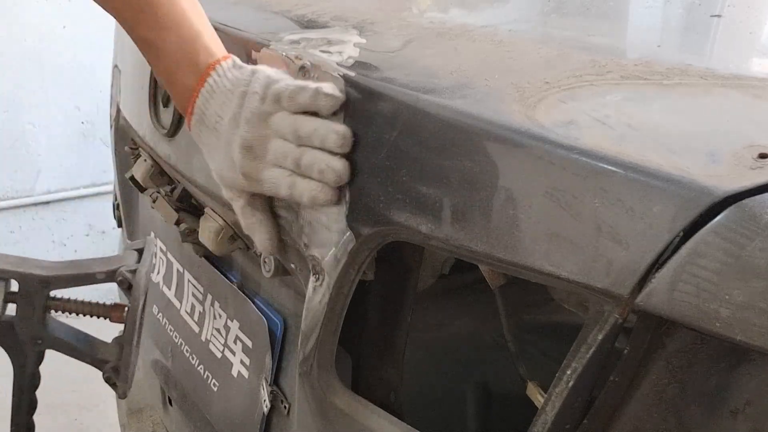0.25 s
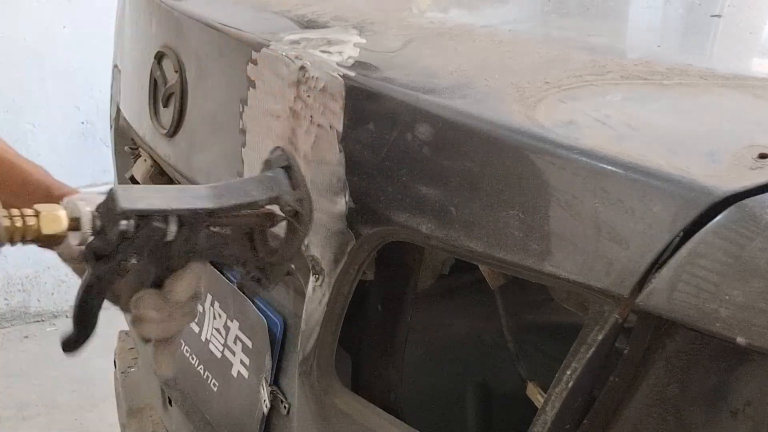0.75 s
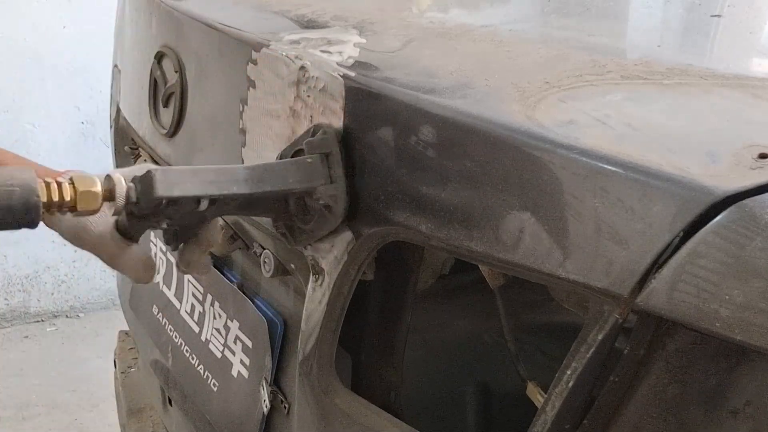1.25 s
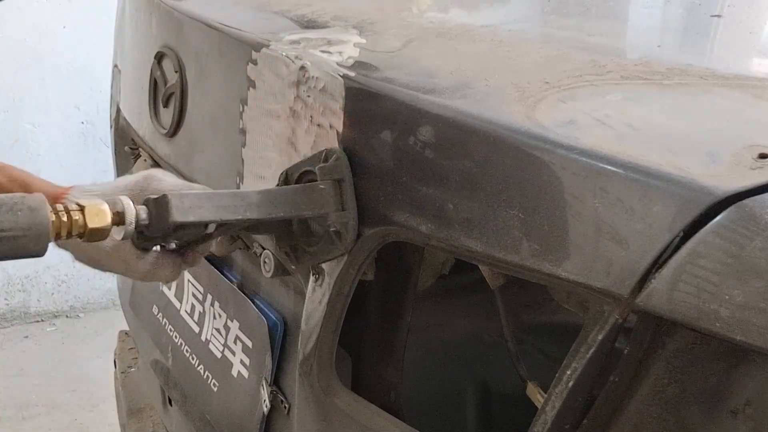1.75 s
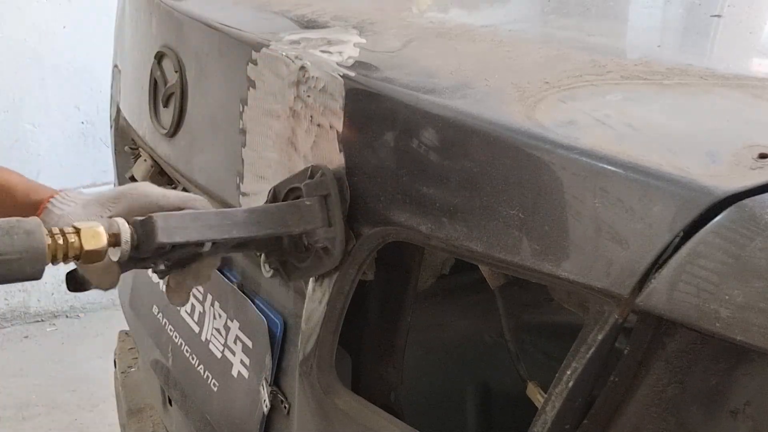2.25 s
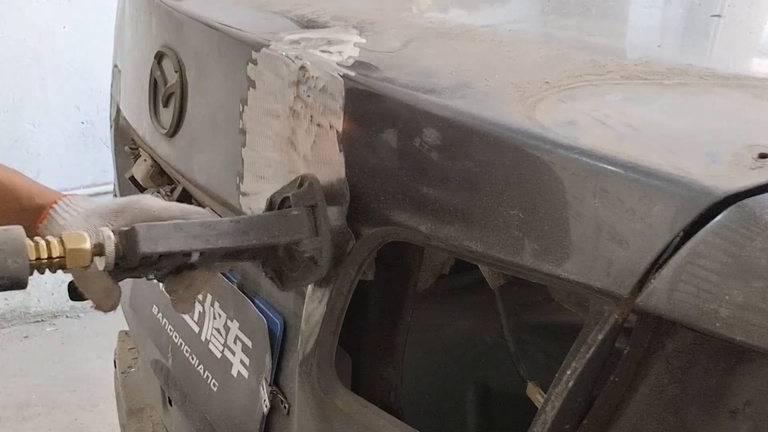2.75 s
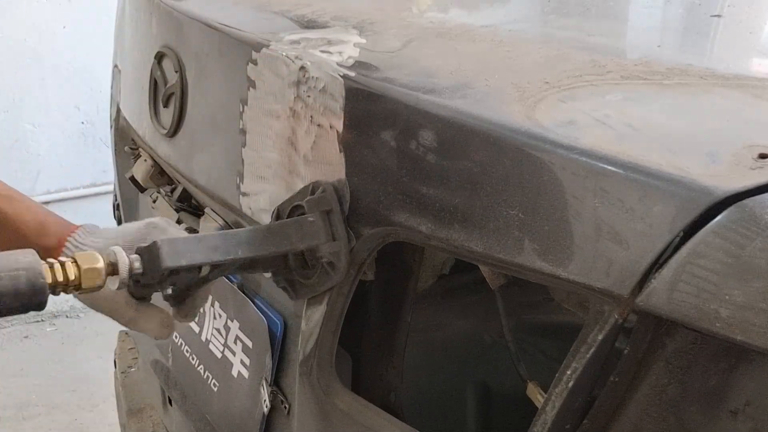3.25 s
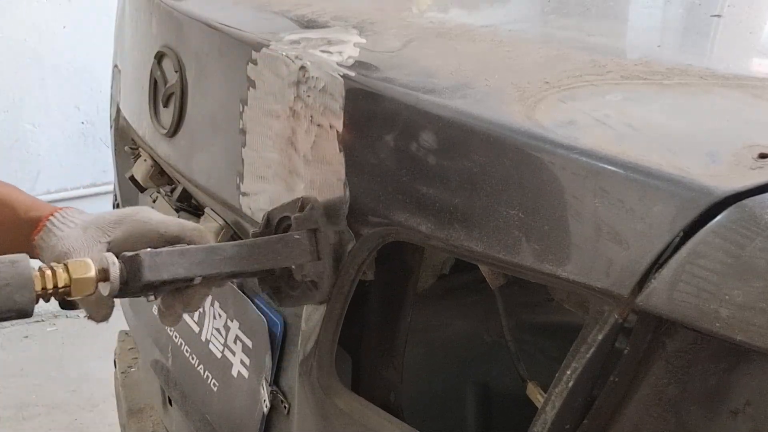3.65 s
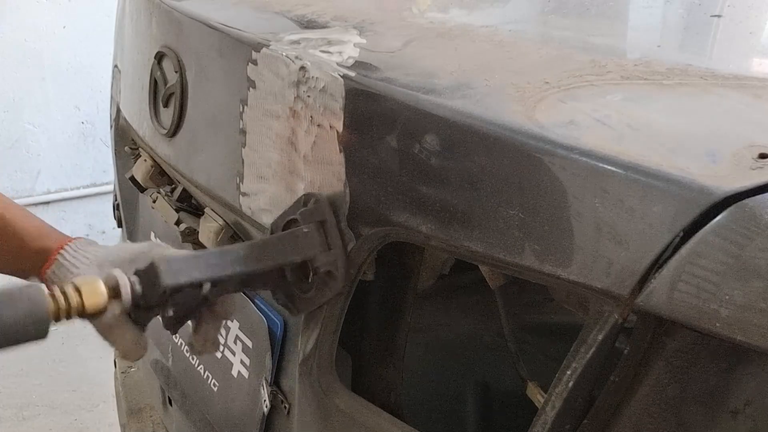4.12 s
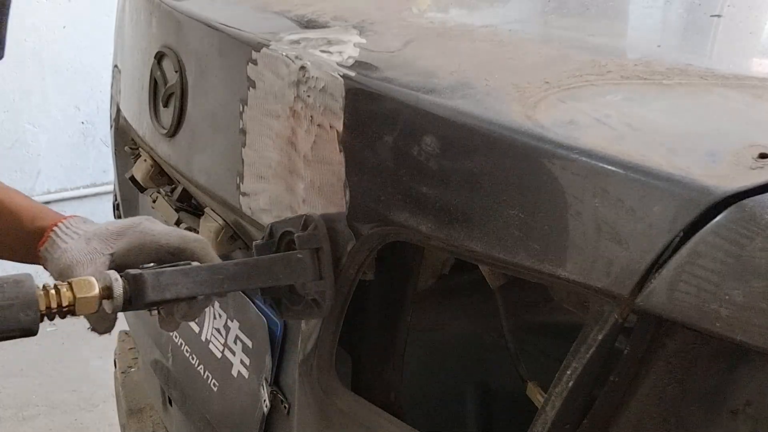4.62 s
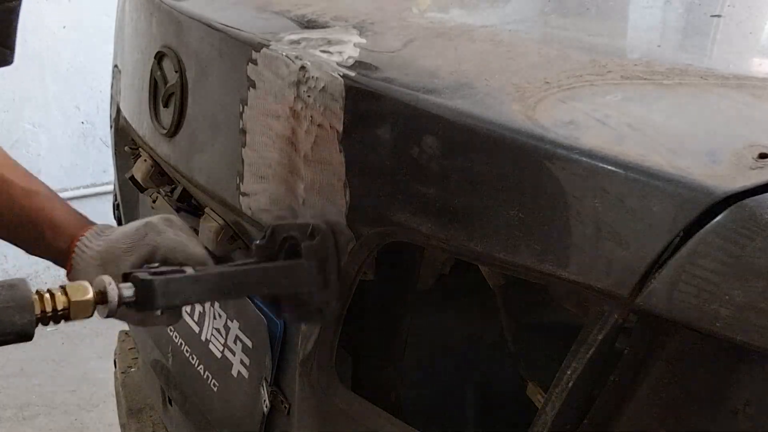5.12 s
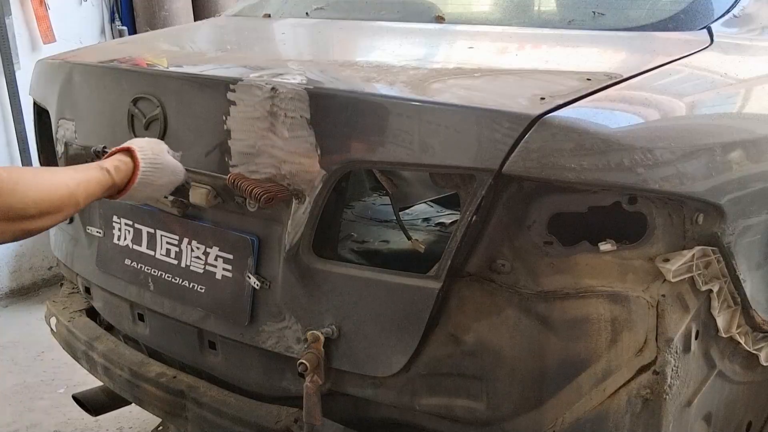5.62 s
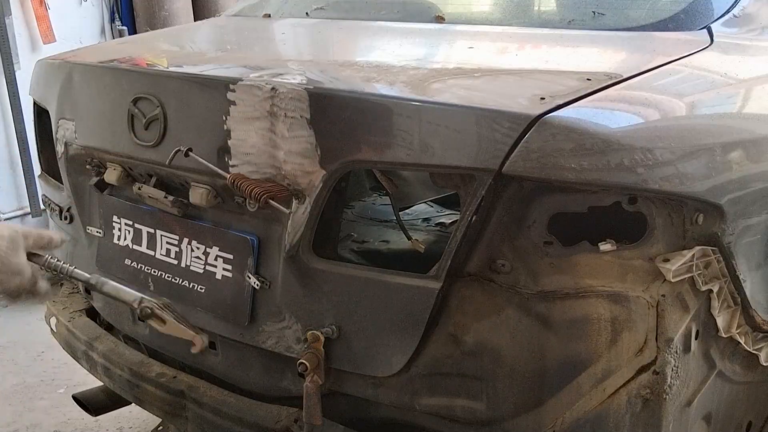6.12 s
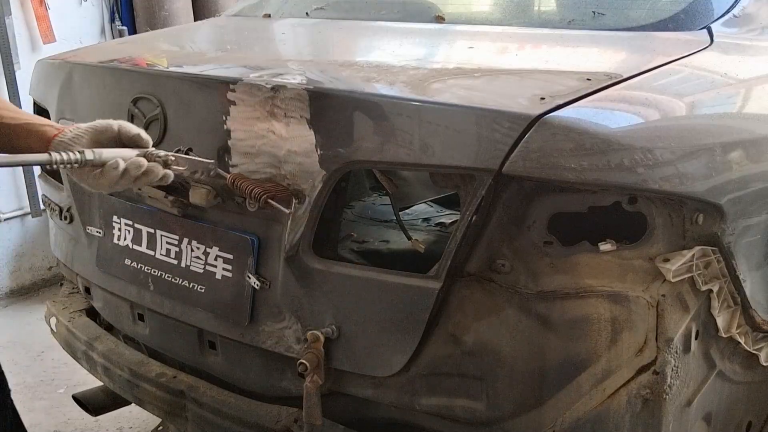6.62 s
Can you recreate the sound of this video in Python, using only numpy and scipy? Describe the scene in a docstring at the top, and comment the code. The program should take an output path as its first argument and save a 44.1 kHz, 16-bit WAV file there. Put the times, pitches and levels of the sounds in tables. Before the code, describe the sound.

Brief glove rubs over low humming workshop air, then irregular hard steel blows on a hollow car panel, two or three a second, with crackling rebounds, jaw grinding and dull low thuds. A wavering high whine sits far behind. After about five seconds a heavy double slam releases the clamp, followed by much quieter iron scratches and a few bright, tiny ticks. Near stereo microphone, short hard reverberation.

```python
"""A clamp on a slide hammer yanks a car's boot lid: blows ring filtered-noise modes and a sine drum and boom.
Jaws grind, sheet metal groans and a glove wipes: random slips through coloured spectra; frame and rod ring as sines.
Near the end the clamp slips off with a slam, an iron tool scrapes and a rod clicks in the hand.
A far motor whines as noise around a wandering pitch; workshop air is shaped noise with hum; all but the air reverberates."""
import sys
import numpy as np
from scipy import signal
from scipy.fft import rfft, irfft, next_fast_len
from scipy.io import wavfile

SR = 44100
rng = np.random.default_rng(int(sys.argv[2]) if len(sys.argv) > 2 else 0)


def master_out(mix):
    """Clip the mix to full scale and print it as 16-bit PCM to the path in sys.argv[1]."""
    frames = np.transpose(np.atleast_2d(mix))
    ceiling = np.clip(frames, -1, 1)
    pcm = np.round(ceiling * 32767).astype(np.int16)
    wavfile.write(sys.argv[1], SR, pcm)


N = 302967
TIME = np.arange(N) / SR

# blows on the panel: start_s, level_db, hardness_db, boom_db, drum_pitch_hz, crack_over_ring_db
BLOW_EVENTS = [(0.008, -39, 7, -63, 322, -16), (0.776, -56.5, 14, -56, 283, 34),
               (0.861, -70, 12, -52, 241.5, 14), (0.949, -33, -2, -51, 313, 19),
               (1.112, -37, -5.5, -50, 310, 14), (1.322, -47, 0, -51, 290, 8),
               (1.36, -44, 8.5, -49, 300, 1), (1.412, -35.5, 9, -57, 330, 6),
               (1.421, -17.5, -3, -33, 324, 12.5), (1.451, -34.5, -13, -53, 345, -5),
               (1.618, -26, 0.5, -39, 324, 25), (1.755, -42, -1.5, -46, 315, 27.5),
               (1.846, -41, -6.5, -48, 267, 36), (2.046, -43, 4.5, -61, 315, 0),
               (2.083, -22.5, 3, -55, 293.4, 1.5), (2.094, -23, -4.5, -36.5, 309, -14),
               (2.122, -26, -4, -48, 328, 8), (2.298, -28, 0.5, -42.5, 352, 36.5),
               (2.409, -45.5, -7, -58, 304, 22.5), (2.48, -41, -7, -54, 311, 33),
               (2.663, -46.5, -0.5, -54, 270, -7.5), (2.722, -29, 3, -43, 303, 16),
               (2.773, -41, 7, -50, 315, 24), (2.812, -24, 0, -54, 326, 44),
               (2.978, -31, -0.5, -48, 354, 30), (2.984, -41.5, 0, -41.5, 284, 32.5),
               (3.139, -38.5, -8.5, -41, 275, -1), (3.436, -32.5, 1, -32, 345, 20),
               (3.468, -41, 9, -61, 336, 27), (3.497, -21, 3.5, -48, 326.6, 21),
               (3.772, -27, -2.5, -28.5, 298, 15), (3.895, -41.5, -7, -54, 258, 3),
               (4.189, -53, 17, -44.5, 259, 0), (4.245, -32, -3.5, -39, 279, 8),
               (4.299, -26.5, 4, -50, 252, 31), (4.604, -43, -15.5, -38, 313, 22.5),
               (4.881, -56.5, -11, -46.5, 282, 6), (4.99, -38, -4, -43.5, 305, 21),
               (5.06, -38.5, -4.5, -47, 290, 13), (5.136, -27, -5, -31, 255, 7.5),
               (5.146, -17.5, -2.5, -19.5, 261.5, -2), (5.187, -25, -7.5, -28, 262, -0.5),
               (5.227, -48.5, -9, -33, 297, 2), (5.444, -47, 0, -56.5, 295, -17),
               (6.22, -79.5, 16.5, -50, 249, -3), (6.622, -52.5, 7, -54, 319, -6)]
# registers of the struck steel, boom to edge: low_hz, high_hz, ring_t60_s, rise_s, crack_share (ratio),
# level_db, tilt (dB per dB of hardness), drag_db
STEEL_REGISTERS = [(66, 183, 0.32, 0.0051, 0.025, -0.5, 0, 1.5),
                   (211, 570, 0.18, 0.0023, 0.06, 0.35, -1.0, -8),
                   (467.4, 1370, 0.19, 0.002, 0.96, -1.06, -0.41, -5),
                   (1470, 7970, 0.21, 0.000068, 1, -0.5, 0.5, -1),
                   (5250, 14000, 0.18, 0.0011, .45, -7.5, 1.39, 0.5)]
# broad spectrum of the struck steel: freq_hz, level_db (per Hz, relative)
STEEL_SPECTRUM = [(29, -32), (50, -13), (75, -22.5), (137, -12.5), (206, -18), (256, -5), (341, -0.5),
                  (501, -6.5), (718, -9.5), (981, -12), (1280, -16), (3760, -13.5), (6380, -23),
                  (10600, -18), (15500, -30.5)]
# modes of lid and clamp: freq_hz, width_hz, level_db (over the dense modes)
LID_MODES = [(85, 12, -7), (139, 21, -2.5), (268, 4.3, 3), (300, 2.6, 5), (345, 26, -5), (710, 8.5, -0.5),
             (729, 3.9, 10.5), (810, 23, 6.5), (976, 7.9, 9.5), (984, 23, 4.5), (1110, 11, -10.5),
             (1217, 16, 6.5), (1370, 19, -11), (1450, 32, 0.5), (1657, 6.1, 14), (1956, 60, 4),
             (2205, 10, -15.5), (3120, 22, -12.5), (3040, 24, -11.5), (3500, 16, -10), (4130, 31, -2)]
BOOM_HZ, BOOM_T60_S, BOOM_SHARE = 85.9, 0.21, 0.27  # whole lid swinging on its hinges


def blows(crack_s=0.0031, drag_s=0.0092, drag_loss_db_per_db=0.086, drag_ref_db=-35,
          drum_share=0.57, drum_t60_s=0.13, pull_sharp=0.1,
          chatter_hz=260, chatter_db=2.5, side_db=-4.0):
    """Jaws drag, crack and rebound as steel rings down; hardness tips drum to edge, strong blows drag less."""
    lead, size, head = int(0.04 * SR), int(0.6 * SR), int(0.03 * SR)
    t = (np.arange(size) - lead) / SR
    after = np.maximum(t, 0)
    out = np.zeros((2, N + 2 * size))

    # long waves alike at both ears, short ones differ
    mid, side = colour(rng.standard_normal((2, N)), STEEL_SPECTRUM, LID_MODES)
    steel = mid + from_db(side_db) * band(side, 150, 16000) * [[1], [-1]]
    steel = steel * flutter(chatter_hz, chatter_db)

    starts = rng.integers(0, N - size, len(BLOW_EVENTS))
    rattles = [rebounds(after, crack_s) for _ in BLOW_EVENTS]
    drum_fade = from_db(-60 * after / drum_t60_s)
    boom = np.sqrt(2) * np.sin(2 * np.pi * BOOM_HZ * after) * from_db(-60 * after / BOOM_T60_S)

    for k, register in enumerate(STEEL_REGISTERS):
        low_hz, high_hz, t60_s, rise_s, crack_share, register_db, tilt, drag_db = register
        modes = rms_one(band(steel, low_hz, high_hz))
        attack = 1 - np.exp(-after / rise_s)
        fade = from_db(-60 * after / t60_s)
        crack = 2 * crack_share * np.exp(-after / crack_s)
        drag = np.exp(-np.abs(t) / drag_s) * (1 - attack)
        for blow, start, rattle in zip(BLOW_EVENTS, starts, rattles):
            start_s, level_db, hardness_db, boom_db, drum_hz, crack_db = blow
            mix = modes[:, start:start + size]
            ring = mix * attack * (fade * (1 + crack_share * rattle) + from_db(crack_db) * crack)
            if k == 0:
                ring = (1 - BOOM_SHARE) * ring + BOOM_SHARE * boom * attack
            if k == 1:  # stretched sheet: pitch glides from above drum_hz to below it
                glide_hz = drum_hz * (1 + pull_sharp * (drum_fade - 0.5))
                phase = 2 * np.pi * np.cumsum(glide_hz * (t > 0)) / SR
                drum = np.sqrt(2) * np.sin(phase) * attack * drum_fade
                ring = (1 - drum_share) * ring + drum_share * drum
            ring = ring / np.sqrt(np.mean(ring[:, lead:lead + head] ** 2))
            loss_db = drag_loss_db_per_db * max(level_db - drag_ref_db, 0)
            dragged = from_db(drag_db - loss_db) * drag * mix
            gain_db = (level_db if k else boom_db) + register_db + tilt * hardness_db
            at = max(0, round(start_s * SR))
            out[:, at:at + size] += from_db(gain_db) * (ring + dragged)
    return out[:, lead:lead + N]


def rebounds(after, crack_s, gap_s=0.011, level_db=-1.5, count=8):
    """Loose jaws strike again: envelope of small cracks at uneven gaps, level against the ring."""
    gaps, sizes = rng.uniform(0.4, 1.6, (2, count))
    hits_s = np.cumsum(gap_s * gaps)
    cracks = sum(size * (after > s) * np.exp(-np.abs(after - s) / crack_s)
                 for s, size in zip(hits_s, sizes))
    return from_db(level_db) * cracks


# jaws grinding along the panel edge: start_s, hold_s, level_db
GRIND_STROKES = [(0.002, 0.0053, -28.5), (0.772, 0.0039, -45.5), (1.362, .004, -33), (2.70, 0.034, -30.5),
                 (3.136, 0.017, -44.5), (3.408, .05, -31.5), (4.188, 0.11, -35)]
# spectrum of the grinding jaws: freq_hz, level_db (per Hz, relative)
JAW_SPECTRUM = [(240, -16), (400, -5.5), (994, 7), (1140, -7), (1530, 3), (2630, 6), (4180, 14),
                (6640, 1.5), (10700, 3), (16000, -3.5)]
# sheet flexing under the pull: start_s, hold_s, level_db (before flex_trim_db)
FLEX_STROKES = [(2.73, 0.037, -27.5), (3.15, .03, -35), (3.29, 0.024, -33), (3.385, 0.061, -31.5),
                (3.96, 0.0041, -38.5), (4.03, 0.006, -45.5), (4.785, 0.0068, -47.5), (4.89, 0.027, -49)]
# spectrum of the flexing sheet: freq_hz, level_db (per Hz, relative)
SHEET_SPECTRUM = [(41, -37), (70, -51.5), (118, 5.5), (171, -8.5), (332, 1.5), (388, -18), (554, -13),
                  (1030, -29.5), (1200, -28.5), (1560, -51), (2640, -120)]


def clamp(flex_trim_db=-2):
    """Teeth grind on the edge and the loaded sheet groans: random slips through the body's spectra."""
    teeth = colour(friction(per_s=6000, spread_db=2.5), JAW_SPECTRUM, LID_MODES)
    teeth = teeth * flutter(rate_hz=45, depth_db=3.5)
    grind = swell(GRIND_STROKES, attack_s=0.022, release_s=0.049) * teeth
    slips = colour(friction(per_s=5000, spread_db=1), SHEET_SPECTRUM)
    groan = swell(FLEX_STROKES, attack_s=0.029, release_s=0.099) * slips
    return grind + from_db(flex_trim_db) * groan


# knocks on the clamp's frame: start_s, level_db
FRAME_KNOCKS = [(0.951, -45), (2.98, -24.5), (5.146, -20)]
# modes of the clamp's frame: freq_hz, level_db, t60_s
CLAMP_FRAME_MODES = [(830, -4, 0.17), (935, -1.5, 0.16), (995, -4, 0.1), (1020, -8.5, .12),
                     (1236, -13.5, 0.09)]


def clamp_frame():
    """Knocks set the frame's few modes ringing."""
    return rings(FRAME_KNOCKS, CLAMP_FRAME_MODES)


# light steel-on-steel ticks of jaws and rod: start_s, centre_hz, level_db, t60_s
TICK_EVENTS = [(0.778, 11800, -26, 0.023), (1.056, 11500, -52, 0.086), (1.358, 4770, -27, 0.044),
               (3.436, 4220, -20.5, 0.036), (4.186, 3900, -25.5, 0.044), (6.255, 11100, -32, 0.033),
               (6.394, 12100, -28.5, 0.024), (6.622, 9220, -43, 0.034)]


def ticks(rise_s=0.0012):
    """A small contact stirs only an octave of high, quickly damped modes."""
    out, t = np.zeros((2, N)), TIME[:SR // 5]
    for start_s, centre_hz, level_db, t60_s in TICK_EVENTS:
        noise = rng.standard_normal(len(t)) + rng.standard_normal((2, len(t)))
        modes = rms_one(band(noise, centre_hz / np.sqrt(2), centre_hz * np.sqrt(2)))
        envelope = from_db(level_db - 60 * t / t60_s) * (1 - np.exp(-t / rise_s))
        at = round(start_s * SR)
        out[:, at:at + len(t)] += modes * envelope
    return out


# iron tool catching and skipping: start_s, hold_s, shaft_db, tip_db
SCRAPE_STROKES = [(5.69, 0.0047, -53, -42.5), (5.731, 0.0056, -45, -40.5), (5.773, 0.032, -46, -43.5),
                  (5.864, 0.021, -51.5, -45.5), (5.921, 0.028, -38.5, -41), (5.977, 0.014, -39, -62)]
# broad spectrum of the iron: freq_hz, level_db (per Hz, relative)
IRON_SPECTRUM = [(350, -46), (600, -5), (970, -4.5), (1290, -10.5), (1800, -1), (2240, -10.5), (10300, -1),
                 (11500, -5.5), (16000, -9)]
# resonances of the iron: freq_hz, width_hz, level_db (over the broad spectrum)
IRON_RESONANCES = [(862, 36, 15.5), (980, 19, 20.5), (1083, 49, 13.5), (1814, 71, 12.5), (2080, 40, 14),
                   (2780, 91, 10), (3080, 72, 11), (3700, 49, 9), (3860, 84, 14), (4450, 100, 13.5),
                   (4860, 23, 18), (5840, 700, 13), (11500, 160, 20), (11900, 160, 11), (14200, 250, 9)]
SHAFT_TOP_HZ = 3300


def iron_tool(ring_t60_s=0.048, jingle_db=-2, attack_s=0.018, release_s=0.043, count=70):
    """The tip catches and skips; each damped mode is rung by its own random few of the skips."""
    rows = np.array(SCRAPE_STROKES)
    first = int((rows[0, 0] - 0.04) * SR)
    last = int((rows[-1, 0] + 0.14) * SR)
    skips = friction(per_s=3000, spread_db=2)
    jingle = np.zeros((2, N))
    decay = from_db(-60 / (ring_t60_s * SR))  # per sample
    for hz in np.linspace(2400, 15500, count) + rng.uniform(-90, 90, count):
        w = 2 * np.pi * hz / SR
        caught = skips[:, first:last] * (rng.random(last - first) < 0.02)
        resonator = [1, -2 * decay * np.cos(w), decay * decay]
        jingle[:, first:last] += signal.lfilter([0, np.sin(w)], resonator, caught + 1e-18)
    jingle /= np.sqrt(np.mean(jingle[:, first:last] ** 2))

    excitation = rms_one(skips) + from_db(jingle_db) * jingle
    iron = colour(excitation, IRON_SPECTRUM, IRON_RESONANCES)
    shaft = band(iron, 650, SHAFT_TOP_HZ)
    tip = band(iron, SHAFT_TOP_HZ, 16000)
    return sum(swell(rows[:, [0, 1, column]], attack_s, release_s) * part / np.std(part[:, first:last])
               for column, part in [(2, shaft), (3, tip)])


# rod clinking: start_s, level_db
ROD_CLINKS = [(6.221, -64), (6.259, -72), (6.396, -72), (6.621, -60)]
# modes of the rod: freq_hz, level_db, t60_s
STEEL_ROD_MODES = [(2700, -13, 0.435), (4240, -3, 0.21), (4520, -1, .14), (8554, 8, 0.15), (10400, -3, .15),
                   (11200, -5, .13)]


def rod():
    """Each clink rings the rod's modes."""
    return rings(ROD_CLINKS, STEEL_ROD_MODES)


# glove wiping the panel: start_s, hold_s, level_db (before wipe_trim_db)
WIPE_STROKES = [(0.15, 0.06, -45.5), (0.285, 0.073, -46), (0.43, 0.009, -48), (0.555, 0.079, -45.5)]
# tools sliding through the glove: start_s, hold_s, level_db (before slide_trim_db)
SLIDE_STROKES = [(5.44, 0.075, -61), (6.22, 0.033, -55), (6.31, 0.15, -61), (6.62, .012, -44)]
# spectrum of the glove: freq_hz, level_db (per Hz, relative)
GLOVE_SPECTRUM = [(240, 10), (400, -4), (2000, -6), (3370, -3), (7630, -8.5), (10400, 4), (15000, -4),
                  (16000, 2)]


def handling(wipe_trim_db=5.0, slide_trim_db=-0.5):
    """Cotton hisses over paint and steel: dense small slips, coloured by the cloth."""
    cloth = colour(friction(per_s=12000, spread_db=2.5), GLOVE_SPECTRUM)
    wipes = swell(WIPE_STROKES, attack_s=0.061, release_s=0.03)
    slides = swell(SLIDE_STROKES, attack_s=0.014, release_s=0.065)
    return cloth * (from_db(wipe_trim_db) * wipes + from_db(slide_trim_db) * slides)


# speed of a distant motor: time_s, pitch_hz
MOTOR_PITCH = [(1.05, 2390), (1.3, 2475), (1.929, 2505), (2.6, 2383), (3.351, 2416), (3.7, 2424),
               (4.121, 2620), (4.47, 2313), (4.7, 2320), (4.9, 2480), (5.2, 2400)]
WHINE_REF_HZ, WHINE_DB, WHINE_DB_PER_HZ = 2400, -64, 0.0289  # louder as it runs faster


def far_motor(blur_hz=62, fade_s=0.094):
    """A whine that sags and softens under load, blurred and broken up by many reflections."""
    time_s, pitch_hz = np.transpose(MOTOR_PITCH)
    pitch = np.interp(TIME, time_s, pitch_hz)
    phase = 2 * np.pi * np.cumsum(pitch) / SR
    blur = lowpass(rng.standard_normal((2, 2, N)), blur_hz)
    whine = rms_one(blur[0] * np.cos(phase) + blur[1] * np.sin(phase))
    level = swell([(time_s[0], time_s[-1] - time_s[0], WHINE_DB)], fade_s, fade_s)
    level = level * from_db(WHINE_DB_PER_HZ * (pitch - WHINE_REF_HZ))
    return level * whine * flutter(rate_hz=24, depth_db=4)


# spectrum of the workshop air: freq_hz, level_db (per Hz, relative)
AIR_SPECTRUM = [(15, -58.5), (25, -15), (72, 1), (137, 5), (217, -7), (277, -4), (463, -15), (641, -14),
                (754, -10), (1440, -20), (2610, -23.5), (4740, -29), (7310, -39.5), (10400, -37),
                (16000, -40.5)]
# level of the workshop air: time_s, level_db
AIR_LEVELS = [(0, -53), (2.0, -50), (4.6, -50.5), (5.35, -55.5)]
# machine hum in the air: freq_hz, width_hz, level_db (over the broad spectrum)
HUM_MODES = [(83.2, 3.7, -5), (125.2, 3.2, 6.5)]


def air(side_db=-9, treble_side_db=-3):
    """Workshop noise whose level shifts and drops by 5.35 s, alike on both sides in the bass and diffuse above."""
    mid, side = colour(rng.standard_normal((2, N)), AIR_SPECTRUM, HUM_MODES)
    side = from_db(side_db) * side + from_db(treble_side_db) * band(side, 300, 16000)
    level = from_db(np.interp(TIME, *np.transpose(AIR_LEVELS)))
    return level * (mid + side * [[1], [-1]])


# reverberation time of the workshop: freq_hz, t60_s
WORKSHOP_T60 = [(100, .42), (400, 0.3), (1800, 0.34), (3500, 0.3), (6600, 0.29), (12400, 0.2)]


def workshop(x, near_db=-7, near_t60_s=0.043, tail_db=-6, build_s=0.00063, diffuse_hz=600, soak_hz=380):
    """Direct sound, quick reflections off the car body, then the room's tail, different at each ear."""
    size = int(0.6 * SR)
    t = np.arange(size) / SR
    edges_hz = np.geomspace(110, 17000, 9)
    white = rng.standard_normal((2, 2, size))
    tail = 0
    for k, (low, high) in enumerate(zip(edges_hz, edges_hz[1:])):
        t60_s = at_hz(WORKSHOP_T60, np.sqrt(low * high))
        tail = tail + band(white[k % 2], low, high) * from_db(-60 * t / t60_s)
    # bass leaks out of the room instead of returning
    tail = signal.sosfilt(signal.butter(2, soak_hz, "high", fs=SR, output="sos"), tail)
    near = band(rng.standard_normal((2, size)) * from_db(-60 * t / near_t60_s), diffuse_hz, 8000)
    arrive = 1 - np.exp(-t / build_s)
    response = from_db(near_db) * rms_one(near * arrive) + from_db(tail_db) * rms_one(tail * arrive)
    response = response / np.sqrt(size)
    response[:, 0] += 1  # direct sound
    response = response / np.sqrt(np.sum(response ** 2) / 2)
    return signal.fftconvolve(x, response, axes=1)[:, :N]


def rings(hits, modes):
    """Every hit rings all modes of a solid steel part, each with its own phase at the two ears."""
    out, t = np.zeros((2, N + SR)), TIME[:SR // 2]
    for start_s, hit_db in hits:
        at = round(start_s * SR)
        for hz, mode_db, t60_s in modes:
            gain = from_db(hit_db + mode_db - 60 * t / t60_s) * (1 - np.exp(-hz * t))
            phase = rng.uniform(0, np.pi, (2, 1))
            out[:, at:at + len(t)] += np.sqrt(2) * gain * np.sin(2 * np.pi * hz * t + phase)
    return out[:, :N]


def friction(per_s, spread_db):
    """Tiny slips of uneven size at random moments, each reaching the two ears with its own strength."""
    sizes = from_db(spread_db * np.minimum(rng.exponential(1, N), 4))
    ears = rng.standard_normal(N) + rng.standard_normal((2, N))
    return (rng.random(N) < per_s / SR) * sizes * ears


def colour(x, spectrum, modes=()):
    """Pass an excitation through a body with a broad spectrum and narrow resonances; rms 1."""
    size = next_fast_len(N)
    hz = np.arange(size // 2 + 1) * SR / size
    peaks = 1 + sum(from_db(db) ** 2 / (1 + (2 * (hz - f) / width) ** 2) for f, width, db in modes)
    below = np.minimum(1, hz / spectrum[0][0]) ** 2  # roll-off under the first point
    body = from_db(at_hz(spectrum, hz)) * np.sqrt(peaks) * below
    return rms_one(irfft(rfft(x, size) * body, size)[..., :N])


def swell(strokes, attack_s, release_s):
    """Gain over time from (start_s, hold_s, level_db) strokes; attack and release are times for 20 dB."""
    gain = 0
    for start_s, hold_s, level_db in strokes:
        before = np.maximum(start_s - TIME, 0) / attack_s
        past = np.maximum(TIME - start_s - hold_s, 0) / release_s
        gain = gain + from_db(level_db - 20 * (before + past).clip(0, 10))
    return gain


def flutter(rate_hz, depth_db):
    """A gain that wanders at random, with mean power 1."""
    slow = rms_one(lowpass(rng.standard_normal(N), rate_hz))
    return rms_one(from_db(depth_db * np.clip(slow, -2, 2)))


def lowpass(x, hz):
    """Causal second-order low-pass."""
    return signal.sosfilt(signal.butter(2, hz, fs=SR, output="sos"), x)


def band(x, low_hz, high_hz):
    """Causal band-pass."""
    edges_hz = [low_hz, min(high_hz, SR / 2 - 900)]
    return signal.sosfilt(signal.butter(3, edges_hz, "band", fs=SR, output="sos"), x)


def at_hz(points, hz):
    """Read a table on a log-frequency axis."""
    table = np.array(points)
    return np.interp(np.log(np.maximum(hz, 1)), np.log(table[:, 0]), table[:, 1])


def from_db(db):
    """Decibels to gain."""
    return 10 ** (np.asarray(db) / 20)


def rms_one(x):
    """Scale to unit rms."""
    return x / np.sqrt(np.mean(x ** 2) + 1e-20)


def scene():
    """All the work sounds and the far motor in the room, over its air."""
    pull = blows() + clamp() + clamp_frame() + ticks()
    tools = iron_tool() + rod() + handling()
    return workshop(pull + tools + far_motor()) + air()


def record(dry, ceiling=1.2, cutoff_hz=16000):
    """The highest peaks are rounded and the top is cut."""
    rounded = ceiling * np.tanh(dry / ceiling)
    return signal.sosfilt(signal.ellip(10, 0.1, 80, cutoff_hz, fs=SR, output="sos"), rounded)


dry = scene()
out = record(dry)
master_out(out)
```